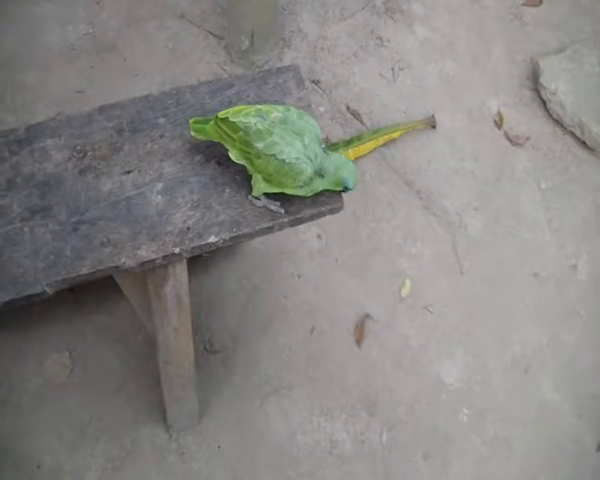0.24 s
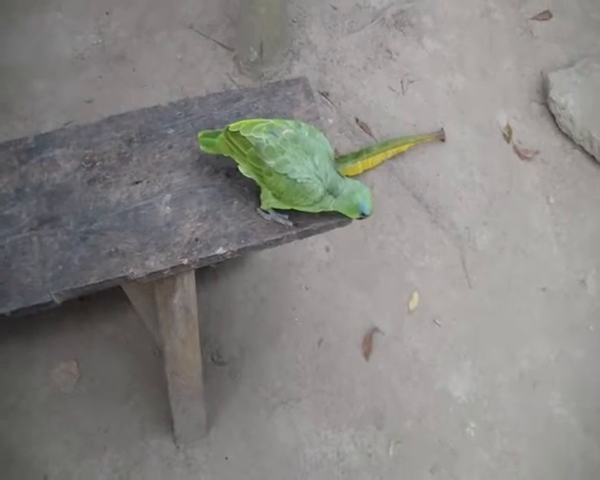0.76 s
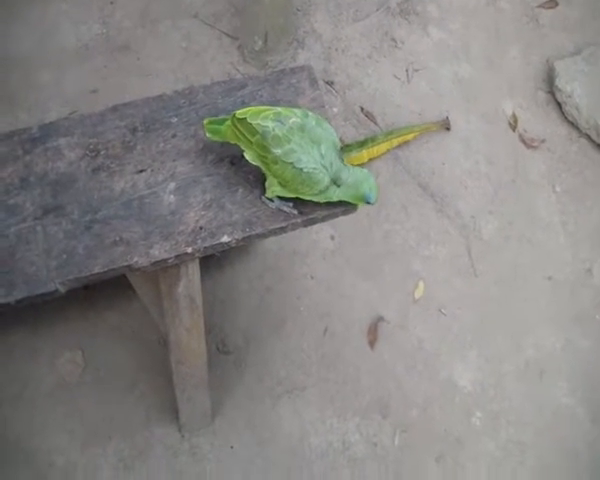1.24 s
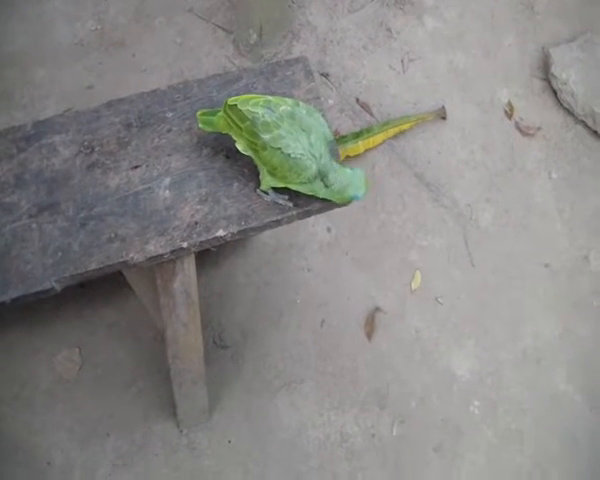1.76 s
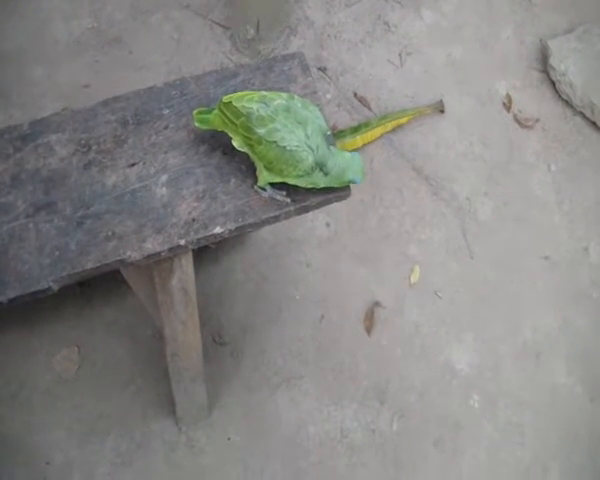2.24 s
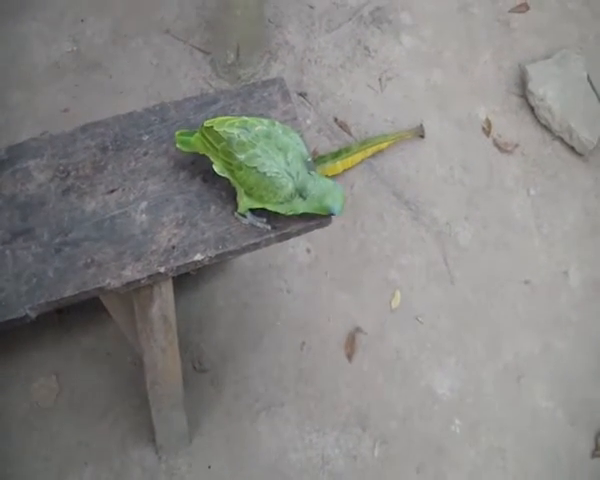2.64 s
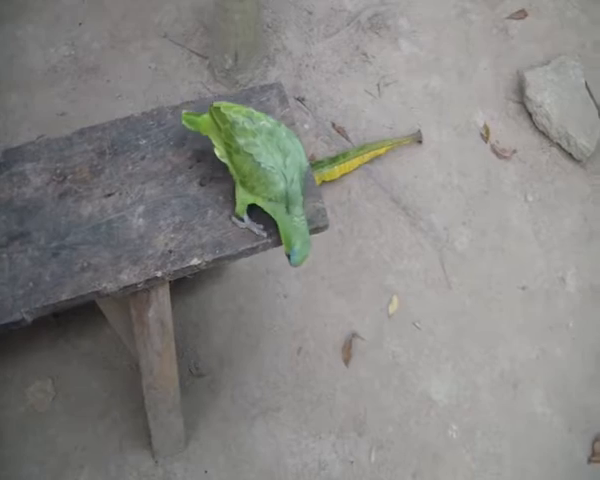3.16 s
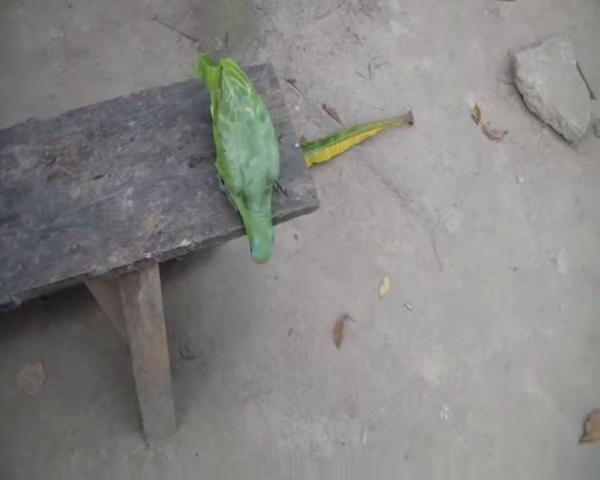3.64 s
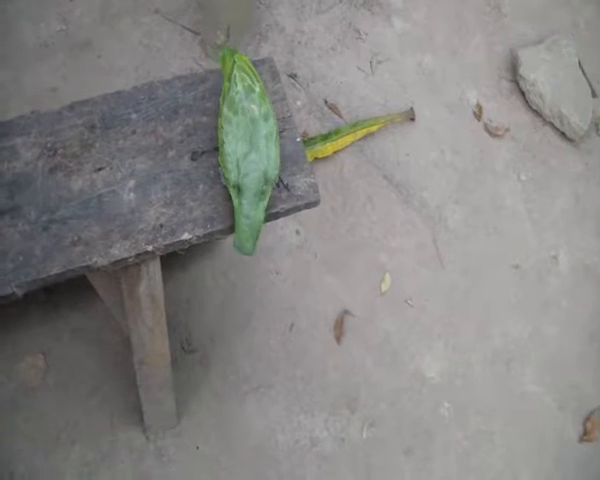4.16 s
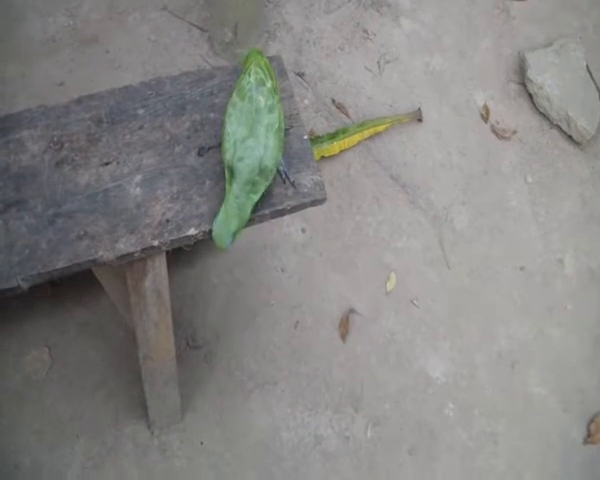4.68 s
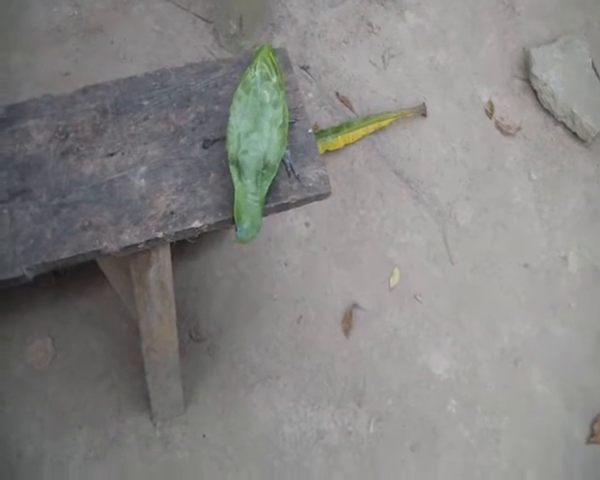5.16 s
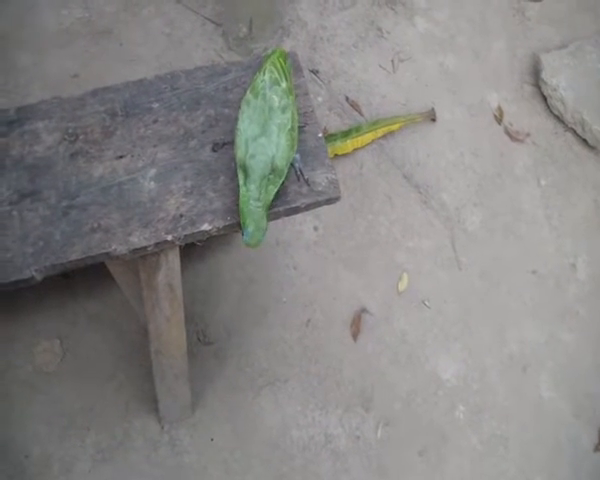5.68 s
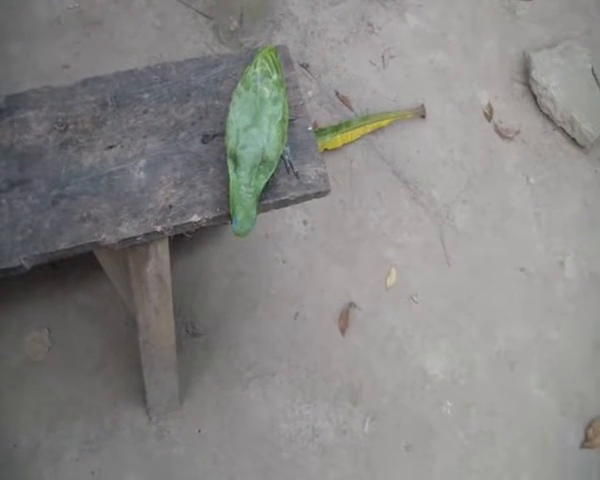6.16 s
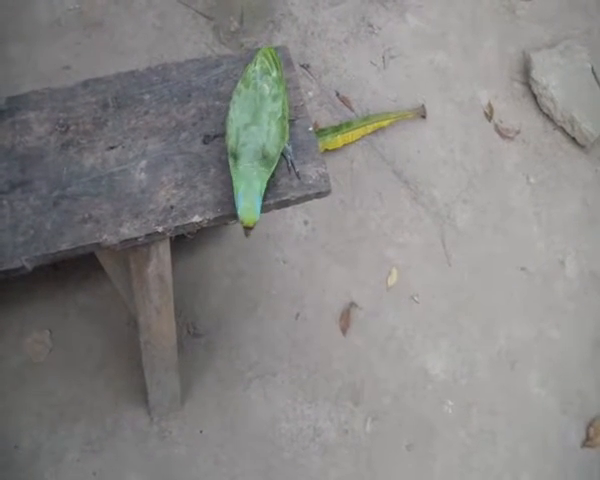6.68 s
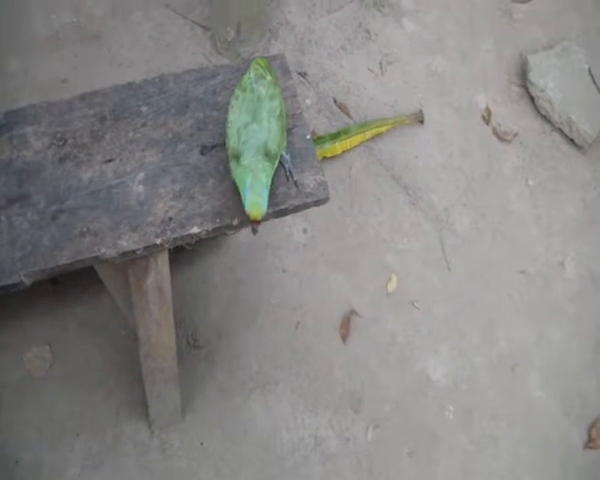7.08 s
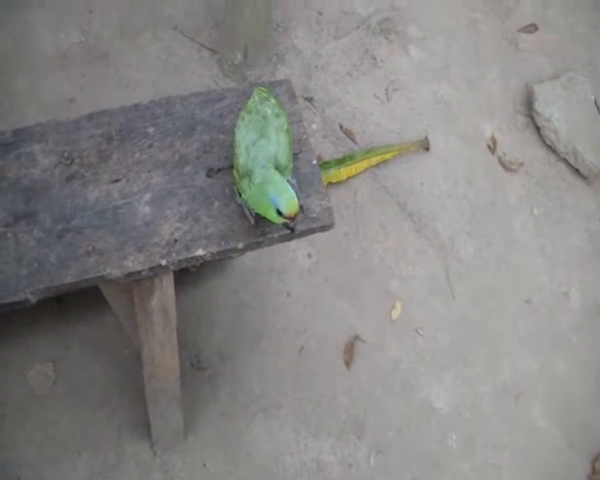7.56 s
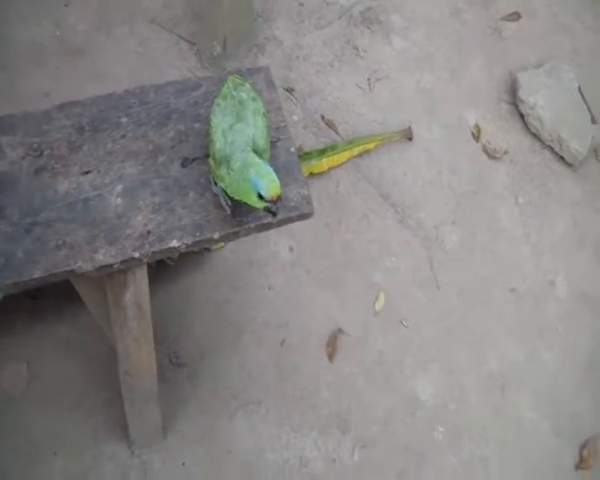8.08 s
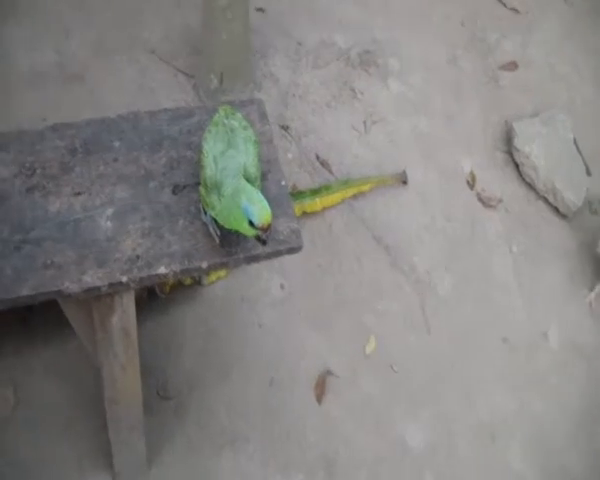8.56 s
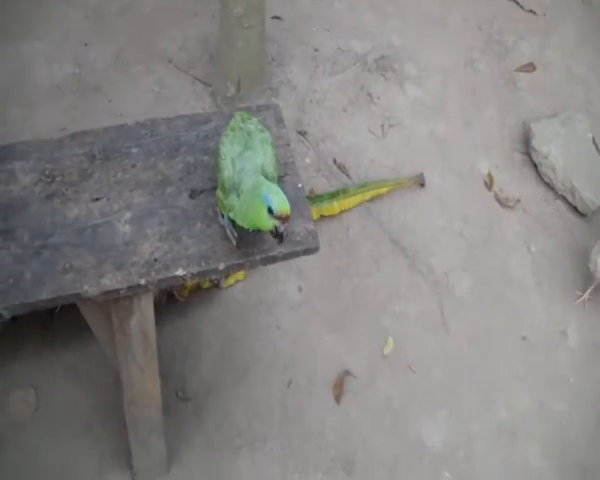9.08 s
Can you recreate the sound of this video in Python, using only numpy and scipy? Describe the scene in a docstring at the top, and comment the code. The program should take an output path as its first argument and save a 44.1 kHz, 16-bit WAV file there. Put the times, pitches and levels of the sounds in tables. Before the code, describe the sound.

Sharp hollow wood knocks, small scrapes and dry snaps from a parrot on a plank, with shrill insects, chick peeps and one late hoarse rasp.

```python
"""Cicadas and a faint cricket drone from the start, over a light breeze rumbling in the microphone and a
thin electronic whine. A parrot walks along a wooden bench: beak and claws knock and scrape the plank's modes.
Low bumps and dry snaps follow, chicks peep in paired sines, feathers rustle, and a hoarse rasp comes late.
Crackles through resonances make the insects, rustles and rasp; shaped noise makes the air."""
import sys
import numpy as np
from scipy import signal
from scipy.io import wavfile
from scipy.ndimage import uniform_filter1d

SR = 44100
rng = np.random.default_rng(int(sys.argv[2]) if len(sys.argv) > 2 else 0)


def put_to_file(sound):
    """Save the sound as 16-bit audio at rate SR, in the file named by the first command-line argument."""
    columns = np.atleast_2d(sound).T  # one column per channel
    safe = np.clip(columns, -1, 1)
    whole_steps = np.round(safe * 32767)
    wavfile.write(sys.argv[1], SR, whole_steps.astype(np.int16))


N = 411012

# Cicadas in a high choir. Each row: pitch in Hz, nominal width in Hz, relative level in dB.
HIGH_CHOIR = [(8260, 240, -7), (8538, 143, 0), (8810, 25, -6.5), (8860, 38, -8), (8405, 77, -6.5)]
# Level curve of the high choir. Each row: time in seconds, level in dB.
HIGH_LEVEL = [(0, -47.5), (3, -46.5), (4.5, -45.5), (5.5, -46.5), (9.32, -46)]
# Cicadas in a low choir. Each row: pitch in Hz, nominal width in Hz, relative level in dB.
LOW_CHOIR = [(6263, 125, 0), (6434, 110, 0)]
# Swells of the low choir, about one a second. Each row: loudest moment in seconds, level in dB.
LOW_SWELLS = [(0.2, -52.5), (1.33, -52.5), (2.47, -55), (3.58, -55), (4.8, -54.5), (6.0, -54.5),
              (7.12, -55.5), (8.42, -54.5)]
# The lone cricket, growing louder late on. Each row: time in seconds, level in dB.
CRICKET_LEVEL = [(0, -74), (7.9, -67), (8.2, -61), (8.6, -62.5), (9.0, -59.5), (9.32, -57)]
# Resonance of the cricket. Each row: pitch in Hz, nominal width in Hz, relative level in dB.
CRICKET_MODE = [(5220, 230, 0)]
# Spectrum of the yard's air. Each row: frequency in Hz, relative density in dB per Hz.
AIR_SPECTRUM = [(20, -4), (70, -5), (105, 0.5), (135, 0), (170, -6), (300, -10), (700, -14), (1500, -18),
                (3300, -19), (5200, -24), (7600, -22), (9300, -28), (12000, -28), (15500, -31)]
# Left-right likeness of the air. Each row: frequency in Hz, likeness from 0 to 1.
AIR_LIKENESS = [(25, 0.0), (60, 0.67), (110, 0.58), (250, 0.41), (600, 0.43), (1500, 0.43), (4000, 0.36),
                (9000, 0.24), (15000, 0.33)]
# Slow moves of the breeze, used around their means. Each row: time in seconds, deep bass in dB, rumble in dB.
BREEZE = [(0.0, -60, -53), (0.54, -67, -50), (1.14, -61, -54), (2.15, -67, -52.5), (3.03, -64, -53.5),
          (3.29, -68, -51.5), (3.91, -60, -54), (7.72, -64, -54), (8.08, -62, -53.5), (8.86, -58.5, -56),
          (8.99, -63, -54), (9.3, -63, -53)]
# Modes of the plank. Each row: pitch in Hz, relative level in dB, free 60 dB fade time in seconds.
PLANK_MODES = [(103.8, -6.5, 0.22), (176, -10, 0.15), (250, -1, 0.096), (360.3, -6, 0.13),
               (455.5, -2, 0.078), (543.6, -8, 0.14), (643.6, -4, 0.058), (682, 1.5, 0.032),
               (741, 13, 0.026), (803, -4.5, 0.11), (895, 3, 0.055), (1020, -13.5, 0.17), (1179, 1.5, 0.11),
               (1323, 2, 0.029), (1410, 2, 0.026), (1552, -5, 0.097), (1814, 6.5, 0.019),
               (1991, 3.5, 0.037), (1951, -6, 0.076), (2190, -5.5, 0.015), (2505, -6.5, 0.046),
               (2950, -6, 0.038), (3310, -9.5, 0.051), (3710, -3, 0.017), (4000, -4, 0.027),
               (4530, -8.5, 0.012), (4900, -14, 0.029)]
# Centres in Hz of the tilt zones that the place of a strike colours: thud, low, body, ring, edge, tick.
ZONES_HZ = [120, 340, 700, 1200, 2000, 3500]
# Colour of the plank's rattle: one tilt in dB for each of those six zones.
RATTLE_TILT_DB = [-10, -3, 1.5, -10, -5, -5]
# Blows on the plank. Each row: time in seconds, nominal level in dB, tilts in dB for thud, low, ring,
# edge and tick, contact time in ms.
KNOCKS = [(0.036, -25, -15, 6.5, -4, -5, -12, 1.23), (0.2913, -1, -0.5, -0.5, -9, -2, -6.5, 1.1),
          (0.458, -36, -8, -2, 4, 14, 10, 1.25), (0.527, -31, 5, 7, -13, -6, -13, 1.2),
          (0.641, -24.5, -8, -1, 0, -4, -10, 0.6), (1.344, -34.5, -5, -7, -5, -7, 6, 1.3),
          (2.349, -31.5, -15, 0, -17, -13, -12, 1.44), (2.37, -22, -19, -4, -14, -12, -6, 1.3),
          (3.365, -35, -10, -4, 15, 14, 3, 1.4), (4.28, -18.5, 6, 4, 7, 6, -2, 1.1),
          (4.364, -22.5, -6, -12, 7.5, 4, 8, 1.25), (4.687, -21.5, 2.5, -4, -2, -12, -12, 1.5),
          (4.724, -31, -1, 0, 6, 1, 6, 1.5), (4.777, -31, -8, -4, 17, 13, 0, 0.85),
          (4.953, -32, -11, -6, 4, -3, -4, 1.33), (5.04, -34, -8, 8, 4, 4, 2, 1.3),
          (5.212, -22.5, 1, -5.5, 2, -6, -18, 1.3), (5.8747, -7.5, -33, -6, -6, -10.5, -7, 2.03),
          (5.879, -6, -54, -3.5, -16, -11, -12.5, 2.1), (6.327, -20.5, -6, 3, 9.5, 8, 5.5, 1.9),
          (6.487, -13.5, 0, -1, -2, -8, -4.5, 1.53), (8.248, -35, 2, -8, -3, -10, -2, 1.1),
          (8.47, -27, -12, -9, -9.5, -16, -1, 1.47), (8.657, -31, -8, -14, -10, -7, -3, 1.47),
          (8.937, -34, 2, -17, -10, -17, 0, 1.4), (8.969, -34, 6, -24, -8, -21, -10, 1.06)]
# Claws and beak dragging over wood. Each row: loudest moment, rise and fall in seconds, relative pressure
# in dB, tilts in dB for low, ring, edge and tick.
SCRAPES = [(0.08, 0.022, 0.07, -50.5, 5, -6, -5, 12), (0.142, 0.021, .06, -48, 2, 2, -6, -2),
           (0.47, 0.078, 0.18, -49, 1, -8, -3, -2), (1.353, 0.073, 0.024, -54, 2, 6, 14, 4),
           (1.45, 0.026, 0.062, -46.5, 5, -11, 1, 2), (2.666, 0.017, 0.063, -34, -4, -9, -3, -4),
           (2.766, 0.061, 0.011, -41, 7.5, 2, 1.5, 2), (2.827, 0.014, 0.038, -46, 5, 2, 12, 10),
           (2.868, .006, 0.035, -42, -1, 6.5, 6, 10), (2.908, 0.031, 0.053, -44.5, -5, 4, 13, 12),
           (2.983, .02, 0.022, -40.5, -8, 2, 4, 4), (3.038, .01, 0.054, -43.5, 4, -1, -1, 5),
           (3.07, 0.016, 0.084, -45.5, 7.5, -1.5, -4, 7), (3.335, .01, 0.019, -49, 0, -5, 7, 14),
           (3.382, 0.026, 0.018, -43, 0, -4, -3, 2), (4.1, 0.085, 0.26, -63.5, -9, -4, 17.5, 18),
           (4.238, 0.069, 0.013, -45.5, 3, -2, 7, 11), (4.315, .02, 0.1, -44.5, 2, -1, 8, 6),
           (4.41, .02, 0.16, -58, 0, 11, 12, 19), (4.53, 0.043, 0.083, -55.5, -12, 14, 7, 5),
           (4.6, .05, 0.084, -46, -4, 1, 5.5, 5), (4.77, .08, 0.078, -48, 3, 7.5, 4, 6),
           (4.891, 0.031, 0.083, -50, 4.5, 3, 4, 2), (4.966, 0.023, 0.013, -36.5, -6, 0.5, -4, -1),
           (5.17, .015, 0.035, -57, -4, 11, 0, 0), (5.048, .03, 0.018, -48, -1, -3, -5, 14.5),
           (6.11, 0.014, 0.02, -44.5, 2, -5, -12, -4), (6.211, 0.043, .025, -47.5, -5, 10.5, 6, 7),
           (6.27, 0.018, .04, -51, -9, -12, -14, -6), (6.7, 0.028, 0.023, -48.5, 11.5, -5, -10, 0),
           (9.016, .02, 0.046, -51, -4, -3, -4, 12), (9.152, .01, 0.023, -57, -6, 12, 7, 8)]
# Low bumps at the microphone. Each row: start in seconds, level in dB, pitch in Hz, length in ms.
BUMPS = [(0.479, -43, 83, 98), (7.249, -34, 92, 107), (7.359, -46, 70.0, 62), (8.819, -41, 37.7, 120)]
# Dry snaps. Each row: start in seconds, relative level in dB, pitch in Hz, left over right in dB,
# body level in dB, crack level in dB.
SNAPS = [(0.6396, -11.5, 3950, 1, 3.5, -1), (4.8447, -5, 3030, -6, 2, -9), (5.955, -16, 3300, -8, -15, -18),
         (6.0809, -14, 2650, -5, 0.5, -19), (6.5968, -20.5, 6350, 2, -0.5, 1.5),
         (6.836, -11, 2800, -4.5, 8.5, -12), (7.402, -28, 11500, 3, -7, 3),
         (8.0563, -9.5, 2020, 4, -5, -20), (8.095, -17.5, 980, 2, -6, -14), (8.328, -29, 1250, 20, 2, -5),
         (8.8111, -17.5, 2300, 1.0, -2, -10)]
# Chick calls, a list of rows per call. Each row: time in seconds, lower and upper pitch in Hz,
# lower and upper level in dB.
PEEPS = [
    [(1.51, 3300, 3970, -63, -64), (1.56, 3330, 4050, -56, -59), (1.585, 3530, 4280, -54, -56),
     (1.625, 3500, 4100, -50, -54), (1.652, 3330, 4330, -56, -59), (1.7, 3220, 3670, -50, -57),
     (1.735, 2950, 3250, -55, -56)],
    [(2.89, 2950, 3700, -60, -75), (2.94, 2950, 3700, -55, -75), (2.95, 3130, 3750, -56, -70),
     (3.0, 3170, 3750, -56, -61), (3.1, 3150, 3680, -52, -61), (3.135, 2980, 3500, -56, -75)],
    [(4.5, 3330, 4000, -61, -70), (4.6, 3400, 4000, -60, -63), (4.68, 3230, 3900, -59, -70),
     (4.73, 3160, 3900, -55, -66), (4.795, 3240, 4100, -52, -64), (4.81, 3530, 4180, -50, -60),
     (4.87, 3550, 4330, -60, -55), (4.92, 3380, 4250, -63, -60), (4.985, 2990, 3600, -48, -70)],
    [(6.78, 3570, 4300, -57, -62), (6.8, 3520, 4250, -45, -52), (6.83, 3300, 4080, -58, -52),
     (6.89, 3200, 3720, -59, -62), (6.925, 3100, 3590, -59, -50), (6.95, 3020, 3450, -62, -60)],
    [(7.09, 3750, 4360, -57, -57), (7.105, 3650, 4250, -54, -54), (7.12, 3300, 3950, -47, -54),
     (7.15, 3230, 3650, -53, -56), (7.175, 3080, 3450, -62, -57)],
    [(8.3, 3620, 4450, -55, -47), (8.33, 3580, 4350, -51, -48), (8.37, 3680, 4520, -55, -54),
     (8.4, 3370, 4250, -57, -51), (8.44, 3260, 3950, -49, -54), (8.47, 3170, 3800, -56, -58),
     (8.5, 3100, 3700, -57, -75)],
    [(8.935, 3720, 4380, -44, -52), (8.985, 3550, 4310, -57, -48), (9.03, 3350, 4100, -65, -56),
     (9.07, 3380, 4000, -62, -51), (9.135, 3400, 4260, -61, -50), (9.17, 3450, 4130, -59, -54),
     (9.2, 3470, 4110, -53, -53), (9.24, 3100, 3500, -55, -50)],
]
# Feathers rustling. Each row: loudest moment, rise and fall in seconds, level in dB,
# first and last pitch in Hz, first and last width in Hz.
RUSTLES = [(2.75, 0.095, 0.037, -55, 5000, 5000, 3500, 3500),
           (3.37, 0.075, 0.026, -54, 5000, 5000, 3500, 3500),
           (4.23, 0.098, 0.024, -51, 5000, 5000, 3500, 3500),
           (4.31, 0.039, 0.46, -53.5, 5000, 5000, 3500, 3500),
           (4.604, 0.06, .05, -51.5, 5000, 5070, 3500, 3500),
           (4.759, 0.14, 0.087, -57, 5030, 5000, 3500, 3500),
           (5.262, .015, 0.077, -38.5, 1200, 4880, 1500, 1000),
           (6.72, .12, 0.17, -52.5, 1800, 1800, 3000, 3000),
           (6.79, 0.041, 0.068, -45.5, 1800, 1800, 2000, 2000),
           (6.89, 0.11, .13, -45.5, 1900, 1920, 3000, 3000)]
# Level curve of the hoarse rasp. Each row: time in seconds, level in dB.
RASP_LEVEL = [(8.24, -64), (8.256, -47), (8.262, -37.5), (8.284, -32.5), (8.38, -43.5), (8.402, -40),
              (8.446, -49.5), (8.46, -60)]
# Resonances of the rasp. Each row: pitch in Hz, nominal width in Hz, relative level in dB.
RASP_THROAT = [(930, 64, 3), (1240, 78, 2), (1910, 220, -4.5), (3030, 55, -11.5), (3620, 160, -13)]

LOW_REST_DB, SWELL_S = -61.5, 0.2  # low choir between swells, spread of each swell
AIR_DB = -46
FASTEST_GUST_PER_S, DEEP_GUST_DB, RUMBLE_GUST_DB = 1.51, 2, 0.4
WHINE_HZ, WHINE_DB = 15650, -64
CRACK_DB = -13.5  # the beak itself, relative to the blow
RING_AT_0_DB, RING_PER_DB = 0.93, 0.0034  # share of the free fade time; quieter blows ring shorter
RATTLE_DB, RATTLE_FALL_DB_PER_S = -25, 267  # relative to the blow
STROKE_DB = 16  # climb and drop of every scrape and rustle around its loudest moment
SNAP_WIDTH_HZ = 980  # of each of two resonances in a row
THROB_PER_S, THROB_DEPTH = 60.5, 0.57
TOP_HZ = 15900


def gain_of(db):
    """Turns dB into gain."""
    return 10 ** (np.asarray(db) / 20)


def evened(x):
    """Scales a signal to rms 1."""
    return x / np.sqrt(np.mean(x ** 2) + 1e-20)


def read(points, hz):
    """Reads a spectrum table at hz, along log frequency."""
    f, value = np.transpose(points)
    return np.interp(np.log(hz + 1), np.log(f + 1), value)


def spread(rows):
    """Gives the start time and the columns of a curve at every sample."""
    s, *columns = np.transpose(rows)
    t = np.arange(s[0], s[-1], 1 / SR)
    return s[0], [np.interp(t, s, c) for c in columns]


def add(mix, s, sound, pan_db=1.0):
    """Adds a sound at s seconds, louder on the left by pan_db."""
    part = mix[:, round(s * SR):][:, :len(sound)]
    part += gain_of([[pan_db / 2], [-pan_db / 2]]) * sound[:part.shape[1]]


def resonate(x, hz, width):
    """One decaying complex pole makes a resonance of about unit gain."""
    r = np.exp(-np.pi * width / SR)
    return 2 * signal.lfilter([1 - r], [1, -r * np.exp(2j * np.pi * hz / SR)], x).real


def band(x, lo_hz, hi_hz):
    """Passes the band between two frequencies."""
    return signal.sosfilt(signal.butter(2, [lo_hz, hi_hz], "band", fs=SR, output="sos"), x)


def grit(count, per_s, spread_db):
    """Sparse clicks of random sign and uneven size, scaled to rms 1."""
    size = gain_of(spread_db * np.minimum(rng.exponential(1, count), 4))
    sign = rng.choice([-1, 1], count)
    return evened(size * sign * (rng.random(count) < per_s / SR))


def stroke(s, rise, fall, db):
    """Start time and gain of a sound that swells to db at s and fades."""
    t = np.arange(-max(rise, 0.002), max(fall, 0.002), 1 / SR)
    level = np.interp(t, [t[0], 0, t[-1]], [db - STROKE_DB, db, db - STROKE_DB])
    return s + t[0], gain_of(level) * signal.windows.tukey(len(t), 0.1)


def choir(modes, db, same):
    """Many insects click into narrow modes; part of the sound is common to both channels."""
    common, left, right = grit(3 * N, 4000, 2.1).reshape(3, N)
    own = np.sqrt(1 - same ** 2)
    clicks = np.array([same * common + own * left, same * common + own * right])
    out = 0
    for hz, width, level in modes:
        out = out + gain_of(level) * evened(resonate(resonate(clicks, hz, width), hz, 3 * width))
    return gain_of(db) * evened(out)


def insects():
    """Two cicada choirs, the low one swelling and resting, and a lone cricket."""
    t = np.arange(N) / SR
    low_db = LOW_REST_DB
    for s, db in LOW_SWELLS:
        low_db = low_db + (db - LOW_REST_DB) * np.exp(-0.5 * ((t - s) / SWELL_S) ** 2)
    high = choir(HIGH_CHOIR, np.interp(t, *np.transpose(HIGH_LEVEL)), 0.67)
    low = choir(LOW_CHOIR, low_db, 0.69)
    cricket = choir(CRICKET_MODE, np.interp(t, *np.transpose(CRICKET_LEVEL)), 0.8)
    return high + low + cricket


def gusts(rates, t):
    """Slow sines with random phases, weaker as they quicken, sum to a wandering level of rms 1."""
    phases = rng.random((20, 1))
    return evened((np.sin(2 * np.pi * (rates * t + phases)) / np.sqrt(rates)).sum(0))


def air():
    """Random short-time spectra with drifting patches; gusts move the bass."""
    frames, hz = N // 256 + 5, np.fft.rfftfreq(1024, 1 / SR)
    a, b, c, d, patches = rng.standard_normal((frames, 513, 5)).T
    patches = evened(uniform_filter1d(uniform_filter1d(patches, 10, 0), 10, 1))
    t = np.arange(frames) * 256 / SR
    rates = np.geomspace(0.15, FASTEST_GUST_PER_S, 20)[:, None]
    s, deep_db, rumble_db = np.transpose(BREEZE)
    deep = DEEP_GUST_DB * gusts(rates, t) + np.interp(t, s, deep_db - deep_db.mean())
    rumble = RUMBLE_GUST_DB * gusts(rates, t) + np.interp(t, s, rumble_db - rumble_db.mean())
    # the rumble's moves fade out from 170 to 260 Hz
    rumble_share = np.clip((260 - hz[:, None]) / 90, 0, 1)
    gust = np.where(hz[:, None] < 65, deep, rumble * rumble_share)
    same = np.clip(read(AIR_LIKENESS, hz), -1, 1)[:, None]
    left = a + 1j * b
    right = same * left + np.sqrt(1 - same ** 2) * (c + 1j * d)
    spectra = np.array([left, right]) * gain_of(read(AIR_SPECTRUM, hz)[:, None] + 2.1 * patches + gust)
    sound = signal.istft(spectra, nperseg=1024, noverlap=768)[1][:, :N]
    return gain_of(AIR_DB) * evened(sound)


def whine():
    """A thin steady tone that wavers a little in phase and level, unlike in each channel."""
    waver = evened(uniform_filter1d(rng.standard_normal((2, N)), 1500))
    phase = 2 * np.pi * WHINE_HZ * np.arange(N) / SR + 1.2 * waver + [[0], [1.2]]
    return np.sqrt(2) * gain_of(WHINE_DB + 1.2 * waver[::-1]) * np.sin(phase)


def plank(force, tilt_db, ms=0.26, ring=0.8):
    """The force rings every mode, weighted by where it lands; a soft contact lets the modes swell."""
    t = np.arange(5000) / SR
    hz, db, t60 = np.transpose(PLANK_MODES)[:, :, None]
    # bending waves spread with pitch, so modes arrive out of step; near neighbours stay roughly together
    phases = 2 * np.pi * (rng.random() + 1.6 * np.log(hz) + 0.17 * rng.standard_normal(hz.shape))
    swell = 1 - np.exp(-(t * hz / max(ms, 0.1)) ** 2)  # ms holds at 1 kHz; treble answers sooner
    place_db = np.interp(np.log(hz), np.log(ZONES_HZ), tilt_db)
    fade_db = -60 * t / (t60 * ring)
    modes = swell * gain_of(db + place_db + fade_db) * np.sin(2 * np.pi * hz * t + phases)
    return signal.fftconvolve(force, modes.sum(0))


def knock(s, db, thud_db, low_db, ring_db, edge_db, tick_db, ms):
    """A first strike, dying chatter and a loose plank's rattle; the beak itself cracks on top."""
    t = np.arange(8000) / SR
    chatter = rng.standard_normal(8000)
    force = 0.022 * chatter * np.exp(-t / 0.007) + (t == 0)
    tilt_db = [thud_db, low_db, 0, ring_db, edge_db, tick_db]
    sound = plank(force, tilt_db, ms, RING_AT_0_DB + RING_PER_DB * db)
    sound /= 3 * np.sqrt(np.mean(sound[:400] ** 2))
    sound[:8000] += gain_of(CRACK_DB) * band(chatter * np.exp(-t / 0.0013), 5600, 10700)
    rattle = grit(8000, 2500, 1.5) * gain_of(-RATTLE_FALL_DB_PER_S * t) * np.minimum(t / 0.0085, 1)
    rattle = plank(rattle, RATTLE_TILT_DB, ring=0.43)
    sound += gain_of(RATTLE_DB) * rattle / np.sqrt(np.mean(rattle[:2000] ** 2))
    return s - ms / 1000, gain_of(db) * sound  # the contact begins before its loudest moment


def yard(x):
    """Ground and walls return a short sparse tail, other taps per channel."""
    taps = np.zeros((2, 8000))
    at = np.arange(120, 7980, 20) + rng.integers(0, 20, (2, 393))
    np.put_along_axis(taps, at, rng.choice([-1., 1.], at.shape), 1)
    taps *= gain_of(-60 * np.arange(8000) / SR / 0.15)  # falls 60 dB in 0.15 s
    return signal.fftconvolve(x, taps / np.linalg.norm(taps[0]), axes=1)[:, :N]


def scrape(s, rise, fall, db, low_db, ring_db, edge_db, tick_db):
    """The grain of the wood catches and lets go in a train of small blows that ring the plank."""
    s, pressure = stroke(s, rise, fall, db)
    force = gain_of(-29.5) * pressure * grit(len(pressure), 900, 2.6)
    return s, plank(force, [low_db - 2.5, low_db, 0, ring_db, edge_db, tick_db], ring=0.99)


def bump(s, db, hz, ms):
    """A few soft cycles of bass under a rounded swell."""
    t = np.arange(0, ms / 1000, 1 / SR)
    return s, gain_of(db) * np.sin(2 * np.pi * (hz * t + rng.random())) * np.hanning(len(t))


def snap(s, db, hz, pan_db, body_db, crack_db):
    """A short ring at one pitch over a hollow body, a bright crack and a faint scattered tail."""
    t = np.arange(2600) / SR
    decay = 0.31 * np.exp(-t / 0.0027) + 0.026 * np.exp(-t / 0.021)
    force = rng.standard_normal(2600) * decay + (t == 0) * 2.35
    ring = evened(resonate(resonate(force, hz, SNAP_WIDTH_HZ), hz, SNAP_WIDTH_HZ))
    body = gain_of(body_db) * evened(band(force, 960, 3000))
    crack = gain_of(crack_db) * evened(band(force, 1800, 9200))
    return s, gain_of(db - 32.5) * (ring + body + crack), pan_db


def peep(rows):
    """Two sines whose pitch and strength tremble slightly."""
    s, columns = spread(rows)
    hz, db = np.array(columns[:2]), np.array(columns[2:])
    wobble, shiver = evened(uniform_filter1d(rng.standard_normal((2, *hz.shape)), 120))
    phase = 2 * np.pi * np.cumsum(hz * (1 + 0.0064 * wobble), 1) / SR
    tones = gain_of(db + 2.2 * shiver) * np.sin(phase)
    return s, np.sqrt(2) * tones.sum(0) * signal.windows.tukey(hz.shape[1], 0.1), -0.5


def rustle(s, rise, fall, db, first_hz, last_hz, first_width_hz, last_width_hz):
    """Fine crackle through one gliding resonance, with a wide sheen."""
    s, gain = stroke(s, rise, fall, db)
    fizz = grit(len(gain), 6000, 1.0)
    f, t, z = signal.stft(fizz, SR, nperseg=256)
    glide = 1 - np.exp(-t / 0.014)
    centre = first_hz + (last_hz - first_hz) * glide
    width = first_width_hz + (last_width_hz - first_width_hz) * glide
    shape = 1 / (1 + (2 * (f[:, None] - centre) / width) ** 2) / np.sqrt(width / 2000)
    core = evened(signal.istft(z * shape, SR, nperseg=256)[1][:len(gain)])
    sheen = 0.91 * evened(band(fizz, 1450, 12600))
    return s, gain * (core + sheen), -0.5


def rasp():
    """Uneven pulses, throbbing, through a few fixed resonances."""
    s, (db,) = spread(RASP_LEVEL)
    cycle = (np.arange(len(db)) / SR - 0.004) * THROB_PER_S % 1
    throb = 1 - THROB_DEPTH + THROB_DEPTH * np.exp(-cycle / 0.27)
    pulses = grit(len(db), 900, 1.5) * throb
    sound = 0
    for hz, width, level in RASP_THROAT:
        sound = sound + gain_of(level) * evened(resonate(resonate(pulses, hz, 2.2 * width), hz, 4 * width))
    return s, gain_of(db) * evened(sound) * signal.windows.tukey(len(db), 0.1), -0.7


def scene():
    """Near sounds and chicks with their echoes over the steady yard."""
    near, chicks = np.zeros((2, 2, N))
    for make, table in ((knock, KNOCKS), (scrape, SCRAPES), (bump, BUMPS), (snap, SNAPS), (rustle, RUSTLES)):
        for row in table:
            add(near, *make(*row))
    add(near, *rasp())
    for rows in PEEPS:
        add(chicks, *peep(rows))
    echoes = yard(gain_of(-23) * near + gain_of(-12) * chicks)  # the chicks are further off, so wetter
    return near + chicks + echoes + insects() + air() + whine()


def record(dry):
    """A steep low-pass limits the band at the top."""
    lowpass = signal.firwin(511, TOP_HZ, window=("kaiser", 9), fs=SR)
    return signal.oaconvolve(dry, lowpass[None], "same")


dry = scene()
out = record(dry)
put_to_file(out)
```